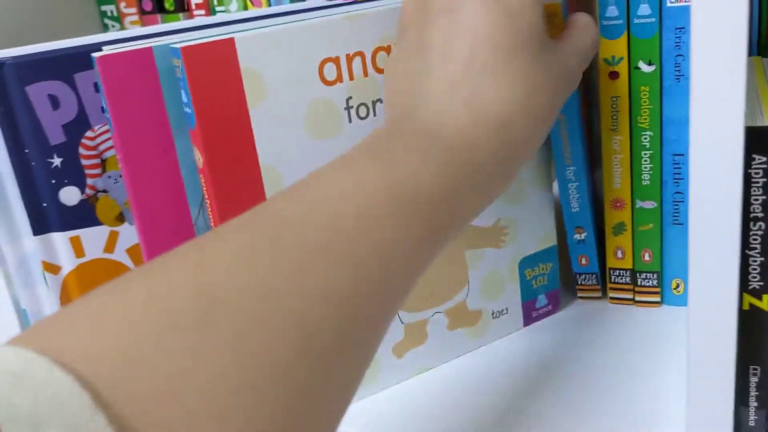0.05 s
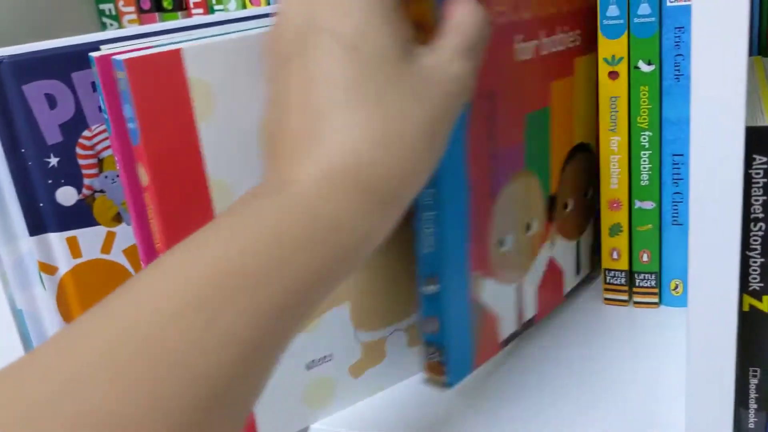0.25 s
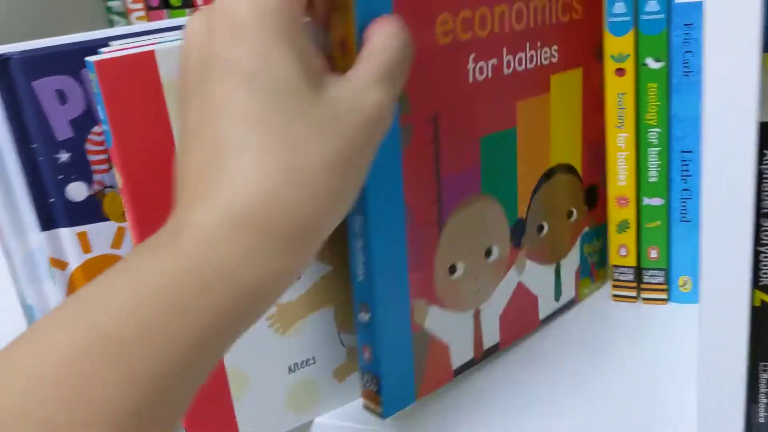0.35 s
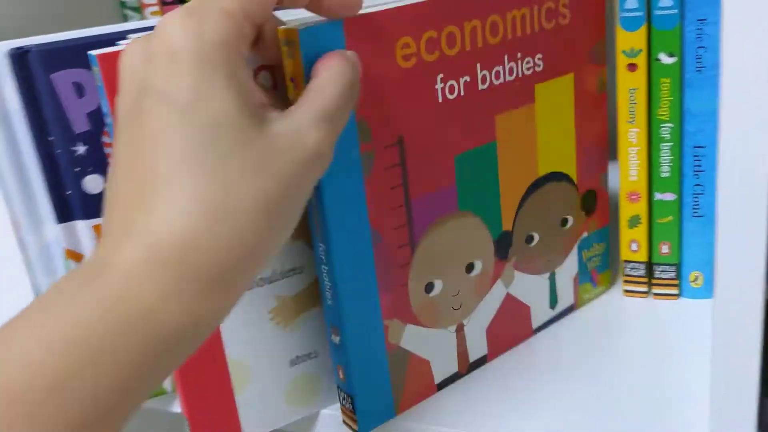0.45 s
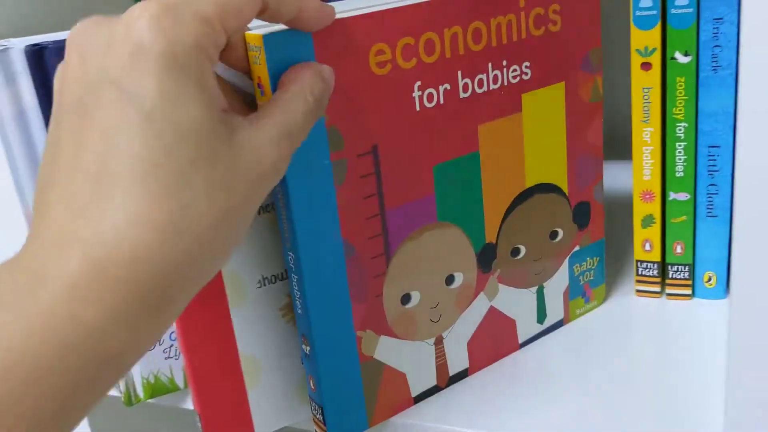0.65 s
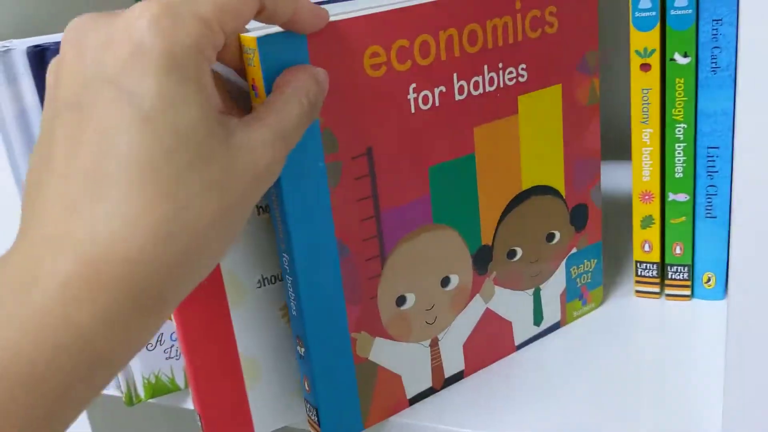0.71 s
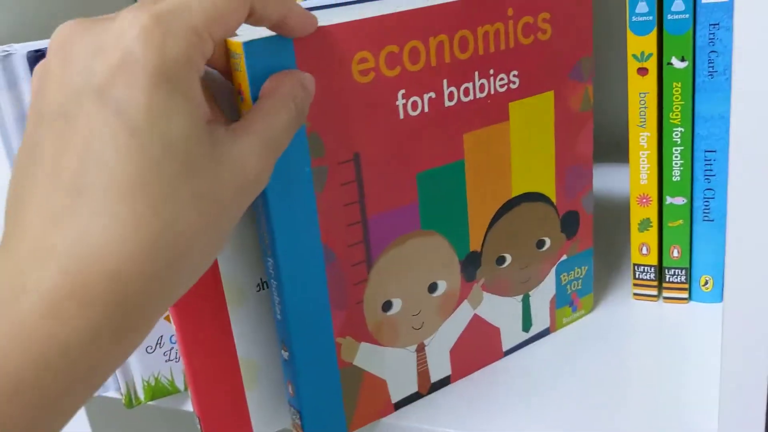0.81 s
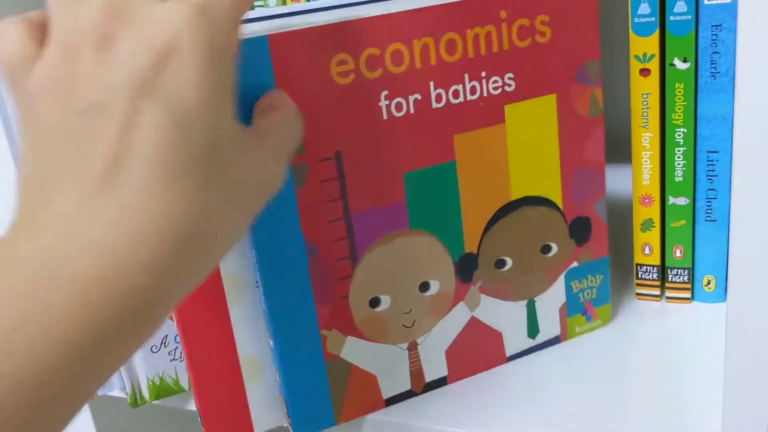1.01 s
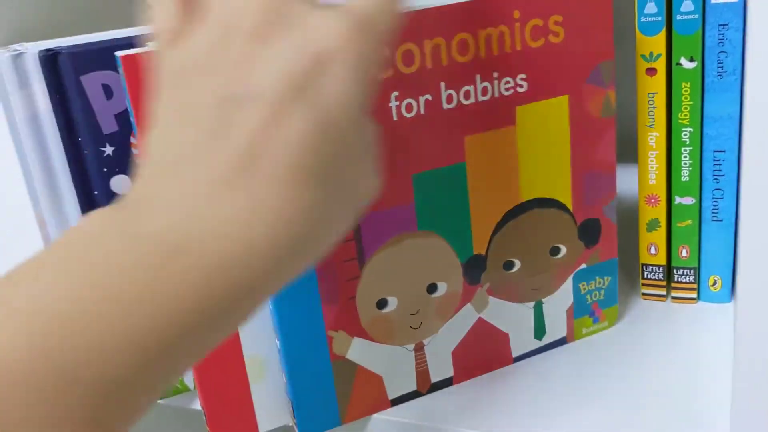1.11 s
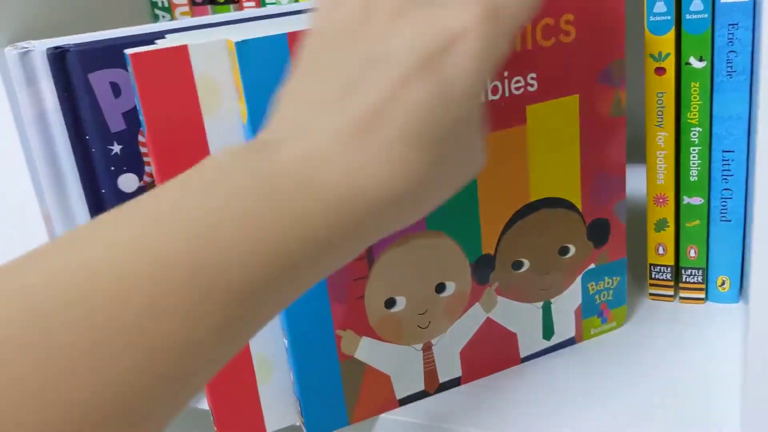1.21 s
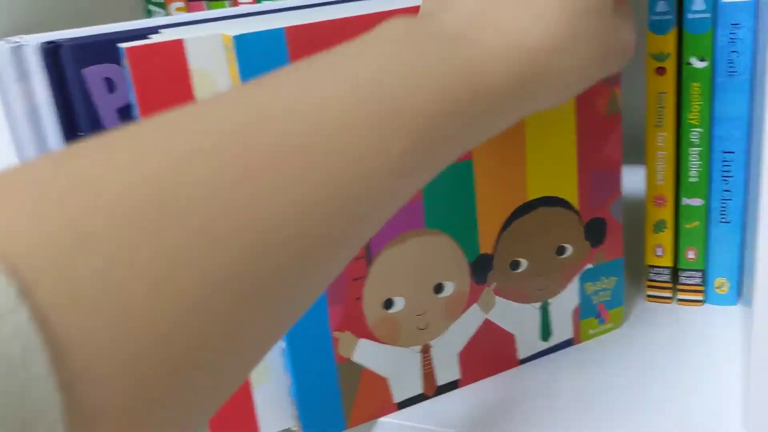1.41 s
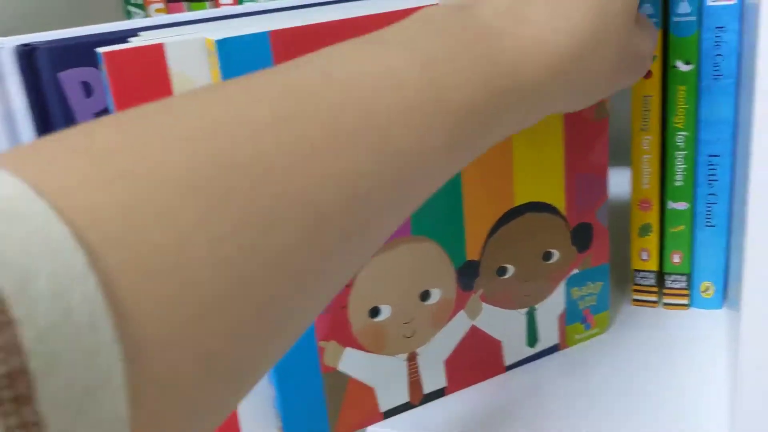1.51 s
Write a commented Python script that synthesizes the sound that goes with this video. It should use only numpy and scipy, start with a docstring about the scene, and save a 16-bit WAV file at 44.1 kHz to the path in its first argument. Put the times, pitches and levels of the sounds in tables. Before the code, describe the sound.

Hard cardboard book covers bump, slide and slap against their neighbours, then faint finger ticks follow

```python
"""A shelf in a small room, heard close by with a pair of microphones: board books are flipped forward by hand.
One bumps, slides out with a hiss of glossy card and drops against its neighbours, which knock and settle.
A hand rubs the covers, fingers tick, skim and rasp on the card, and a book shifts with a soft scuff.
Knocks are damped modes and bursts of noise; the card and hand sounds are coloured noise.
Wall reflections, a diffuse tail and quiet air surround them."""
import sys
import numpy as np
from scipy import signal
from scipy.fft import rfft, irfft
from scipy.io import wavfile

SR = 44100
rng = np.random.default_rng(int(sys.argv[2]) if len(sys.argv) > 2 else 0)


def persist_wave(psi):
    """Save psi, clipped to +-1, as 16-bit WAV."""
    counts = np.round(np.clip(psi, -1, 1) * 32767).astype(np.int16)
    wavfile.write(sys.argv[1], SR, np.atleast_2d(counts).T)


N = 68355  # length of the scene [samples]


def amp(db):
    """Decibels to gain."""
    return 10 ** (np.asarray(db) / 20)


def unit(x):
    """Scales to rms 1, over both channels together."""
    return x / np.sqrt(np.mean(x ** 2) + 1e-20)


def read(points, hz):
    """Reads a (frequency, value) table on a log-frequency axis."""
    f, value = np.transpose(points)
    return np.interp(np.log(hz + 1), np.log(f + 1), value)


def decay(t, t60_s):
    """Exponential fall of 60 dB in t60_s."""
    return np.exp(-np.log(1000) * t / t60_s)


def add(mix, s, sound):
    """Mixes a stereo sound in at time s."""
    part = mix[:, max(round(s * SR), 0):][:, :sound.shape[1]]
    part += sound[:, :part.shape[1]]


def coloured(white, colour):
    """Gives two unrelated noises a spectrum and the likeness heard between the two microphones."""
    # left-right likeness: (frequency [Hz], correlation [0 to 1])
    likeness = [(30, 0.6), (200, 0.97), (600, 0.87), (1500, 0.39), (3500, 0.1), (16000, 0.15)]
    size = white.shape[1]
    hz = np.fft.rfftfreq(size, 1 / SR)
    a, b = rfft(white)
    same = np.clip(read(likeness, hz), 0, 1)
    mid = a * np.sqrt((1 + same) / 2)
    side = b * np.sqrt((1 - same) / 2)
    return irfft(np.array([mid + side, mid - side]) * amp(read(colour, hz)), size)


def dying(x, t60, count=14):
    """Lets each of several overlapping bands of x die away at its own speed."""
    size = x.shape[1]
    t = np.arange(size) / SR
    hz = np.fft.rfftfreq(size, 1 / SR)
    spectrum = rfft(x)
    centres = np.geomspace(60, 16000, count)
    out = 0
    for f, band in zip(centres, np.eye(count)):
        part = irfft(spectrum * read(np.c_[centres, band], hz), size)
        out = out + part * decay(t, max(read(t60, f), 1e-3))
    return out


def ringing(t, hz, t60_s, rise_s):
    """One damped mode that swells from t = 0, a little later on the right."""
    spread_s = .00006  # further delay of the ringing on the right
    age = np.maximum(t - np.array([[0], [spread_s]]), 0)
    return (1 - np.exp(-age / rise_s)) * decay(age, t60_s) * np.sin(2 * np.pi * hz * age)


def board_ring(t, weight, hollow_db, length, contact_s, travel_s):
    """Book and shelf modes, the low ones arriving last and rising slowest, with the ringing air pocket."""
    # book and shelf modes: (frequency [Hz], level [dB], t60 before the ring length factor [s])
    modes = [(159.2, -29.5, .2), (203, -15.5, 0.064), (294.7, -15, 0.085), (374.2, -13.5, 0.041),
             (495, -7.5, .03), (587, -21, .085), (688, -18.5, .044), (838.3, -20.5, 0.075),
             (976, -18, 0.018), (1259.5, -18.5, 0.063), (1565, -4.5, 0.012), (1926, -16, 0.031),
             (2996, -17.5, 0.018), (3470, -24, .022)]
    bend_slope, rise_slope = 1.05, 0.38  # powers by which lower waves arrive later and rise more slowly
    # air pocket between closing covers
    hollow_hz, pocket_db, hollow_t60_s, hollow_rise_s = 1151, -1.5, 0.022, 0.0036
    pocket = ringing(t - travel_s, hollow_hz, hollow_t60_s * length, hollow_rise_s)
    out = amp(pocket_db + hollow_db) * pocket
    for k, (hz, db, t60_s) in enumerate(modes):
        slow = 1000 / hz  # bending waves travel slower at low frequencies
        arrival_s = travel_s * slow ** bend_slope
        mode = ringing(t - arrival_s, hz, t60_s * length, contact_s * slow ** rise_slope)
        out += (-1) ** k * amp(db + read(weight, hz)) * mode  # neighbouring modes have opposite signs
    return out


def cover_slap(t, weight, clatter_db):
    """Flat covers slap together: a noise burst coloured by the blow, each band dying at its own speed."""
    # slap colour: (frequency [Hz], relative spectral level [dB])
    clatter_colour = [(30, -44), (100, -26), (250, 0.5), (600, 5.5), (1600, -2), (3200, -5.5),
                      (5500, -17.5), (9000, -29), (16000, -23)]
    # slap decay: (frequency [Hz], t60 [s])
    clatter_t60 = [(60, 0.39), (300, 0.011), (1200, 0.051), (4000, .03), (14000, 0.015)]
    base_db, rise_s = -13.5, 0.0018
    size = len(t)
    burst = rfft(unit(coloured(rng.standard_normal((2, size)), clatter_colour)))
    burst = irfft(burst * amp(read(weight, np.fft.rfftfreq(size, 1 / SR))), size)
    return amp(base_db + clatter_db) * dying(burst, clatter_t60) * np.minimum(t / rise_s, 1)


def knock(thump_db, body_db, knock_db, edge_db, hollow_db, clatter_db, length, contact_s, travel_s, size=12000):
    """One blow rings book and shelf and slaps the covers; four bands set the colour of both parts."""
    # centres of the thump, body, knock and edge bands [Hz]
    bands_hz = [253, 496, 860, 1650]
    bass_cut_hz = 78  # the small boards hardly radiate below this
    t = np.arange(size) / SR
    weight = np.c_[bands_hz, [thump_db, body_db, knock_db, edge_db]]
    ring = board_ring(t, weight, hollow_db, length, contact_s, travel_s)
    slap = cover_slap(t, weight, clatter_db)
    return signal.sosfilt(signal.butter(2, bass_cut_hz, "high", fs=SR, output="sos"), [ring, slap])


def book_knocks():
    """Books bump, drop and settle: each blow adds to a ringing layer and a slapping layer."""
    # blows: (time [s], thump [dB], body [dB], knock [dB], edge [dB], hollow [dB], clatter [dB],
    # ring length [factor], rise of a 1 kHz mode through contact [s], travel of a 1 kHz bending wave [s])
    blows = [(0.2004, -15.5, -19.5, -20, -18, -34, 4.5, 0.59, 0.0014, 0.00072),
             (0.2133, -3.5, -14, -10, -10.5, -32, -1.5, 0.58, 0.0024, .0007),
             (0.2337, -7, -2.5, -29, -12, -25, -2.5, 0.19, 0.00042, 0.00017),
             (.311, -1.5, -1.5, -6, 1, 0.5, 5, 1.43, 0.00066, .0016),
             (.4591, -5, -6.5, -6, -16.5, -10.5, -1.5, 0.51, 0.0027, .0019),
             (.466, -7.5, -30.5, -17, -24.5, -29, -2.5, 1.07, 0.0015, 0.001474),
             (.5528, -2, -3, -2, -5.5, -37, -2, 0.36, 0.002, .0011),
             (0.5594, -13.5, -12.5, -25, -20, -39, -9, 1.1, 0.00047, .0015),
             (0.6129, -20.5, -14, 2.5, -2.5, -6, -3, 0.58, 0.00061, 0.00215),
             (0.6186, -17, -27, -11.5, -2.5, 8.5, -5, 0.29, 0.00056, 0.001787),
             (1.108, -26, -43.5, -22.5, -29.5, -34, 1.5, 0.52, 0.0017, 0.000935),
             (1.126, -26.5, -49, -25, -34, -37, -8, 1.02, 0.0019, .0019),
             (1.357, -38.5, -45, -84, -68, -72, 2, 0.54, 0.0013, 0.0011)]
    rings, slaps = np.zeros((2, 2, N))
    for s, *blow in blows:
        ring, slap = knock(*blow)
        add(rings, s, ring)
        add(slaps, s, slap)
    return rings, slaps


def snap(db, colour, t60_s, rise_s, size=4096):
    """A short dry snap of card: coloured noise with a quick rise and an exponential decay."""
    t = np.arange(size) / SR
    shape = np.minimum(t / rise_s, 1) * decay(t, t60_s)
    return amp(db) * shape * unit(coloured(rng.standard_normal((2, size)), colour))


def edge_cracks():
    """Hard card edges meet: a bright snap when sharp, a dull one when blunt."""
    # edge contacts: (time [s], level [dB], treble [dB])
    contacts = [(.2019, -32, -1.5), (.2148, -36, -0.5), (.2344, -21.5, -1), (.3127, -13.5, 0.5),
                (.5537, -23.5, -20), (.615, -26.5, -6)]
    # crack colour: (frequency [Hz], relative spectral level [dB])
    crack_colour = [(200, -22.5), (900, 1.5), (1900, -2.5), (3500, 3.5), (5500, -8.5), (9000, -11.5),
                    (16000, -17)]
    # the treble setting comes in across this range: start, end [Hz]
    treble_hz = [4560, 9000]
    out = np.zeros((2, N))
    hz, level = np.transpose(crack_colour)
    for s, db, treble_db in contacts:
        colour = np.c_[hz, level + np.interp(hz, treble_hz, [0, treble_db])]
        add(out, s, snap(db, colour, t60_s=0.017, rise_s=0.00054))
    return out


def friction(level, colour, grain_db, grainy):
    """Tiny slips of uneven size over a smooth hiss, following the stroke."""
    slips_per_s = 7400
    size_db = grain_db * np.minimum(rng.exponential(1, N), 2)
    slips = (rng.random(N) < slips_per_s / SR) * amp(size_db)
    white = rng.standard_normal((2, N)) * np.sqrt(1 + (grainy * unit(slips)) ** 2)
    s, db = np.transpose(level)
    stroke = np.interp(np.arange(N) / SR, s, db)
    return amp(stroke) * unit(coloured(white, colour))


def cover_slide():
    """Glossy cover sliding on cover: a hiss with small slips."""
    # stroke: (time [s], level [dB])
    stroke = [(.197, -61), (.203, -34.5), (.216, -32), (.226, -58.5), (.232, -50), (.237, -29),
              (.262, -32.5), (.295, -30.5), (.314, -29.5), (.328, -31.5), (.40, -69)]
    # colour: (frequency [Hz], relative spectral level [dB])
    colour = [(40, -16.5), (150, 0), (500, -13.5), (1500, -15), (3200, -3), (5500, -1.5), (8500, -4),
              (13000, 3.5), (16000, -2)]
    return friction(stroke, colour, grain_db=-1.5, grainy=.35)


def hand_rub():
    """A hand brushing the covers: mostly smooth friction noise."""
    # stroke: (time [s], level [dB])
    stroke = [(0, -57), (.095, -70.5), (.118, -53), (.15, -56), (.19, -48.5), (.3, -35.5), (.52, -49.5),
              (.59, -45.5), (.72, -58), (.82, -69.5), (.875, -54), (.94, -78), (1.03, -67), (1.11, -49.5),
              (1.22, -88)]
    # colour: (frequency [Hz], relative spectral level [dB])
    colour = [(100, -6.5), (400, -2.5), (1200, -5), (3200, 0.5), (4700, -2.5), (7000, -13.5), (12000, -11),
              (16000, -19)]
    return friction(stroke, colour, grain_db=5.5, grainy=0.13)


def finger_ticks():
    """Fingertips tap card edges, each a short snap of noise."""
    # taps: (time [s], level [dB])
    taps = [(.7712, -45), (0.8031, -45.5), (.931, -46), (.975, -50), (1.038, -51.5), (1.082, -45.5),
            (1.251, -50.5)]
    # colour: (frequency [Hz], relative spectral level [dB])
    colour = [(100, -27), (300, -6), (800, 8), (1800, -6.5), (3500, 3), (8000, -10), (16000, -7.5)]
    out = np.zeros((2, N))
    for s, db in taps:
        add(out, s, snap(db, colour, t60_s=0.046, rise_s=0.0014))
    return out


def book_scuff():
    """A book shifts on the shelf: low, grainy friction."""
    # stroke: (time [s], level [dB])
    stroke = [(1.0, -65.5), (1.05, -61), (1.076, -61.5), (1.105, -44.5), (1.135, -46), (1.175, -59),
              (1.21, -68), (1.3, -75)]
    # colour: (frequency [Hz], relative spectral level [dB])
    colour = [(50, -9.5), (115, 9), (230, 7.5), (400, -8), (650, -8.5), (950, -8), (1700, -11),
              (3800, -9.5), (7000, -23.5), (16000, -34)]
    return friction(stroke, colour, grain_db=6.5, grainy=1.0)


def finger_skim():
    """Fingers skim along the top edges: faint, bright friction."""
    # stroke: (time [s], level [dB])
    stroke = [(1.247, -91.5), (1.252, -59.5), (1.29, -57.5), (1.325, -55.5), (1.345, -62.5), (1.39, -73.5),
              (1.47, -67), (1.55, -70)]
    # colour: (frequency [Hz], relative spectral level [dB])
    colour = [(200, -12), (2400, -7), (3350, 0.5), (4000, -4), (4580, 3.5), (5500, -9), (7500, -9.5),
              (13000, -11)]
    return friction(stroke, colour, grain_db=2, grainy=0.35)


def skin_rasps():
    """Skin catches on glossy card: grainy noise in one narrow band, swelling and letting go."""
    # catches: (start [s], peak [s], end [s], pitch [Hz], peak level [dB])
    catches = [(1.252, 1.305, 1.345, 4790, -59.5), (1.295, 1.324, 1.324, 3350, -53)]
    ends_db = -17  # start and end, below the peak
    width, skirt_db = 0.12, -16  # relative half-width of the band and the level there
    t = np.arange(N) / SR
    out = np.zeros((2, N))
    for start, peak, end, hz, db in catches:
        level = [(start, db + ends_db), (peak, db), (end, db + ends_db)]
        colour = [(hz / 2, 2 * skirt_db), (hz * (1 - width), skirt_db), (hz, 0),
                  (hz * (1 + width), skirt_db), (hz * 2, 2 * skirt_db)]
        out += friction(level, colour, grain_db=3, grainy=1.0) * ((t > start) & (t < end))
    return out


def wall_reflections(x):
    """Distinct early reflections from nearby walls, later on the right."""
    # reflections: (delay [s], level [dB])
    reflections = [(.0125, -19.5), (0.0256, -19.5)]
    spread_s = .00012  # further delay on the right
    late = np.array([x[0], np.roll(x[1], round(spread_s * SR))])
    out = np.zeros((2, N))
    for delay_s, db in reflections:
        add(out, delay_s, amp(db) * late)
    return out


def room_tail(x, size=30000):
    """A diffuse tail of random echoes that builds up quickly and dies band by band."""
    # room decay: (frequency [Hz], t60 [s])
    room_t60 = [(100, 0.97), (170, 0.91), (400, 0.26), (1000, 0.39), (3000, 0.43), (8000, 0.32),
                (16000, 0.93)]
    # room colour: (frequency [Hz], gain [dB])
    room_gain = [(60, -8.5), (160, -5.5), (300, -8.5), (700, -5.5), (1120, -10), (1400, -5.5), (3000, -7.5),
                 (7000, -3), (11000, -8), (15000, -17)]
    build_s = 0.013
    t = np.arange(size) / SR
    echoes = coloured(rng.choice([-1., 1.], (2, size)), room_gain)
    tail = dying(echoes, room_t60) * np.minimum(t / build_s, 1)
    mean_t60_s = np.mean(room_t60, axis=0)[1]
    energy = np.sum(decay(t, mean_t60_s) ** 2)
    return signal.fftconvolve(x, tail / np.sqrt(energy), axes=1)[:, :N]


def quiet_air():
    """The steady quiet of the room: coloured noise, strongest in the bass."""
    # colour: (frequency [Hz], relative spectral level [dB])
    colour = [(25, -4.5), (80, -1.5), (155, 10), (260, -13.5), (600, -16.5), (2000, -14.5), (4500, -20),
              (8000, -28.5), (16000, -26)]
    return amp(-63.5) * unit(coloured(rng.standard_normal((2, N)), colour))


def scene():
    """Knocks, ticks and friction in the room, over its quiet air."""
    ring_send_db, slap_send_db = -1.5, 1.5  # the boxed-in ringing reaches the room less than the slap
    rings, slaps = book_knocks()
    hand = edge_cracks() + cover_slide() + hand_rub() + finger_ticks()
    hand += book_scuff() + finger_skim() + skin_rasps()
    tail = amp(ring_send_db) * room_tail(rings) + room_tail(amp(slap_send_db) * slaps + hand)
    return rings + slaps + hand + wall_reflections(rings + slaps) + tail + quiet_air()


def record(dry, size=2048):
    """Left microphone airy, right one nasal, dull and a little late; peaks round off, then a band limit."""
    # left microphone colour: (frequency [Hz], gain [dB])
    left_colour = [(30, 1), (100, -3), (700, 2.5), (1200, 1), (2000, -0.5), (3300, -5), (5000, -2),
                   (7500, -2), (12000, 0.5), (16000, 3.5)]
    # right microphone colour: (frequency [Hz], gain [dB])
    right_colour = [(30, -7.5), (100, -2.5), (700, 2), (1200, 3), (2000, 1.5), (3300, 4.5), (5000, -0.5),
                    (7500, -7), (12000, -22.5), (16000, -21.5)]
    mic_lag_s = .00011  # the right microphone hears everything slightly later
    ceiling, band_limit_hz = .9, 16100
    hz, out = np.fft.fftfreq(size, 1 / SR), []
    for x, colour, lag_s in zip(dry, (left_colour, right_colour), (0, mic_lag_s)):
        log_gain = np.log(amp(read(colour, abs(hz))))
        response = np.exp(np.conj(signal.hilbert(log_gain)))  # minimum phase
        taps = np.r_[np.zeros(round(lag_s * SR)), np.fft.ifft(response).real]
        out.append(signal.fftconvolve(x, taps)[:N])
    out = np.array(out)
    out = out / (1 + (out / ceiling) ** 6) ** (1 / 6)
    cut = signal.firwin(511, band_limit_hz, window=("kaiser", 9), fs=SR)
    return signal.oaconvolve(out, cut[None], "same")


dry = scene()
out = record(dry)
persist_wave(out)
```